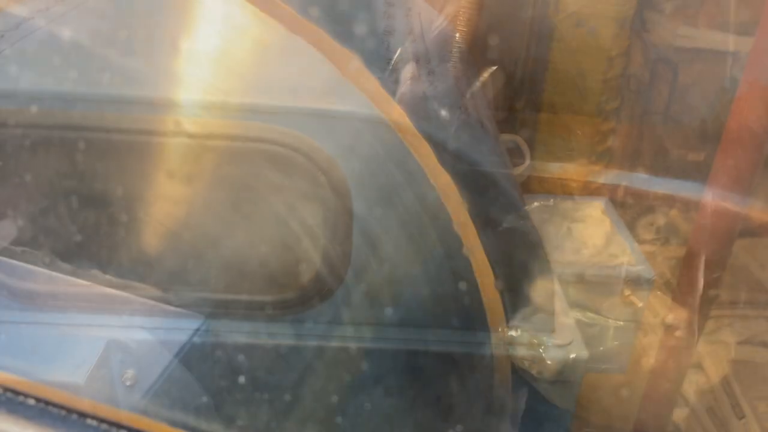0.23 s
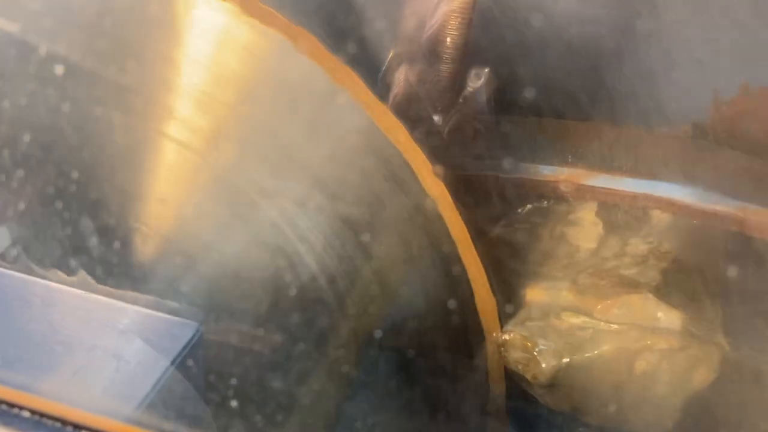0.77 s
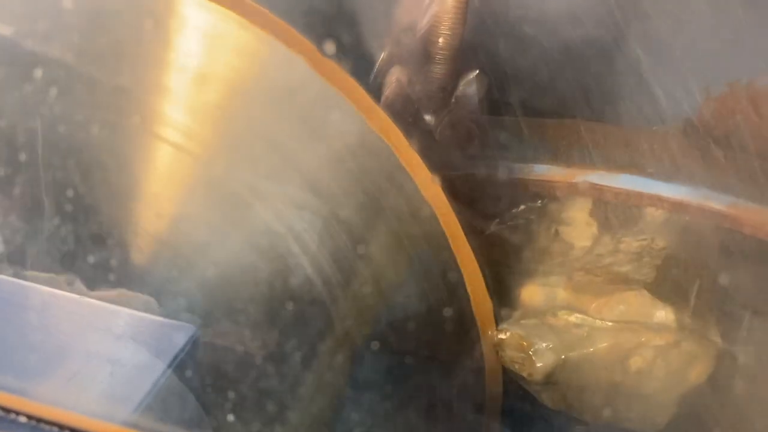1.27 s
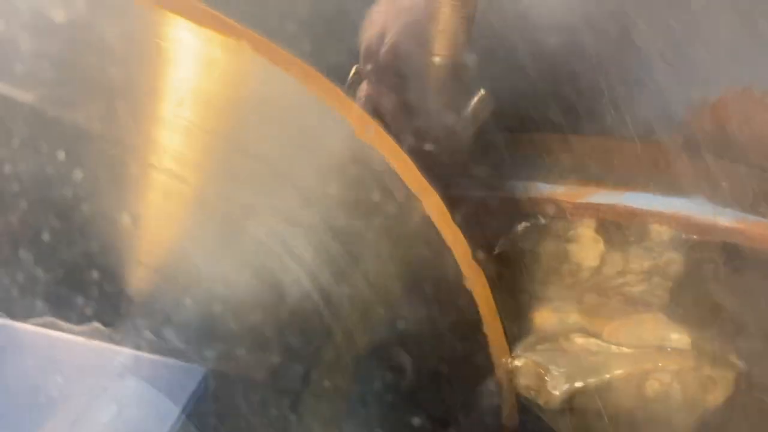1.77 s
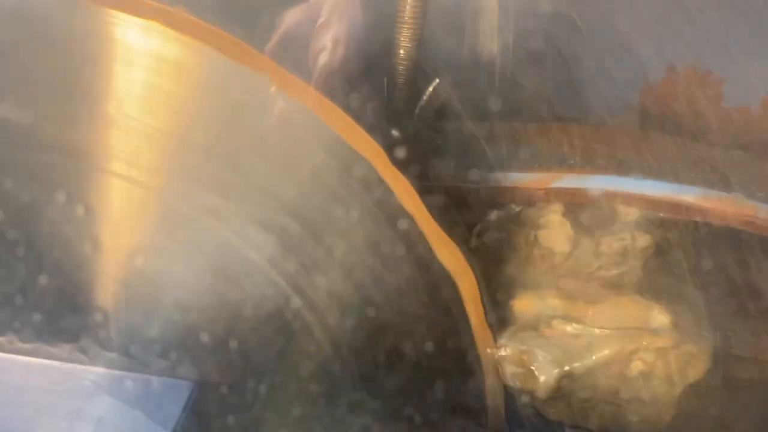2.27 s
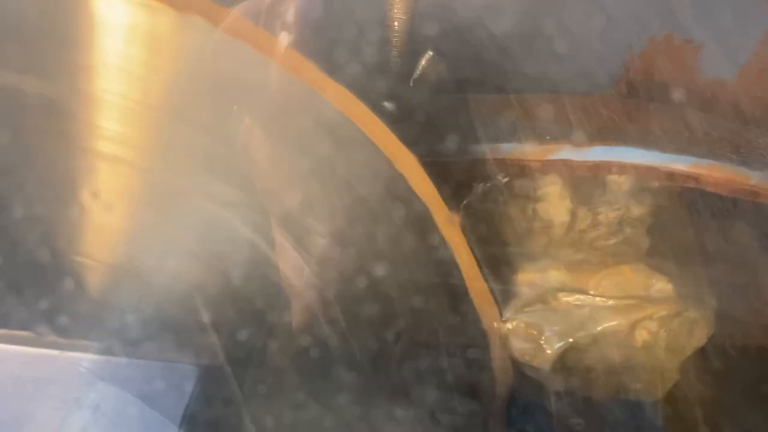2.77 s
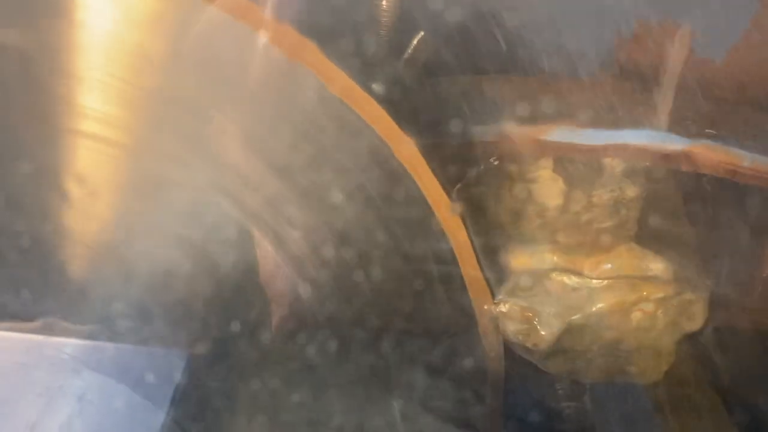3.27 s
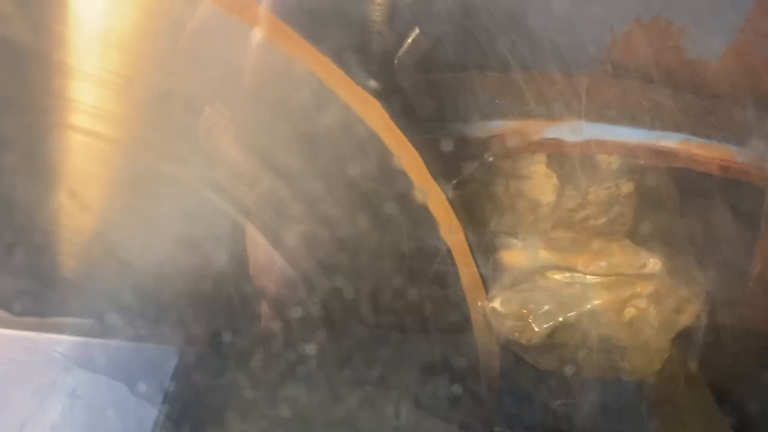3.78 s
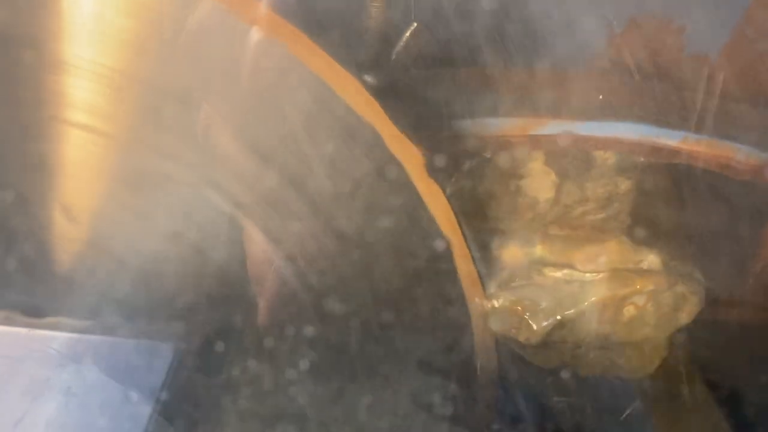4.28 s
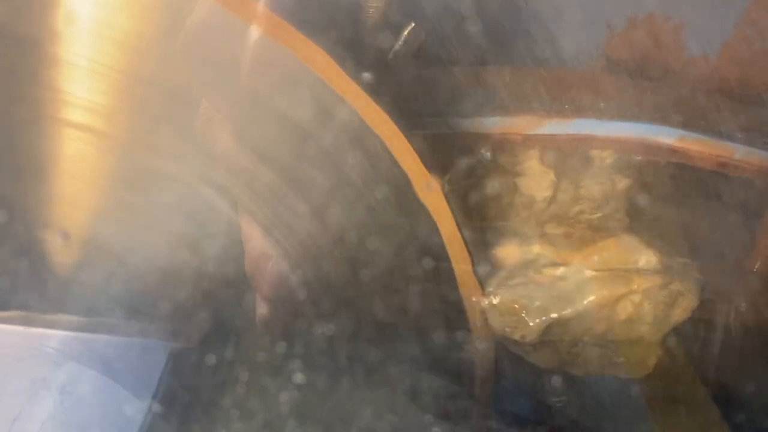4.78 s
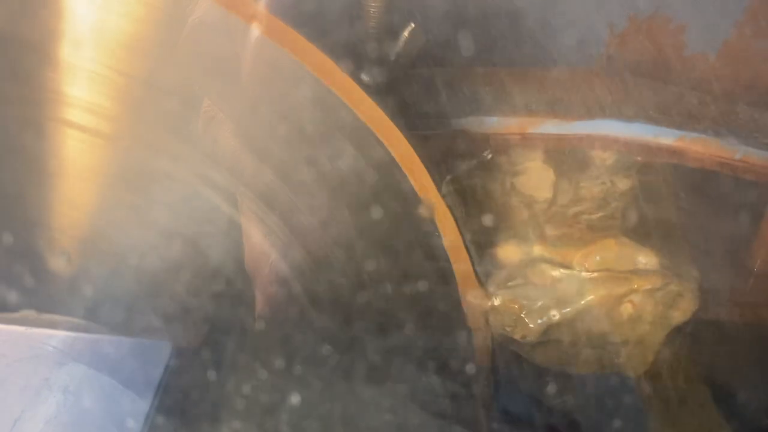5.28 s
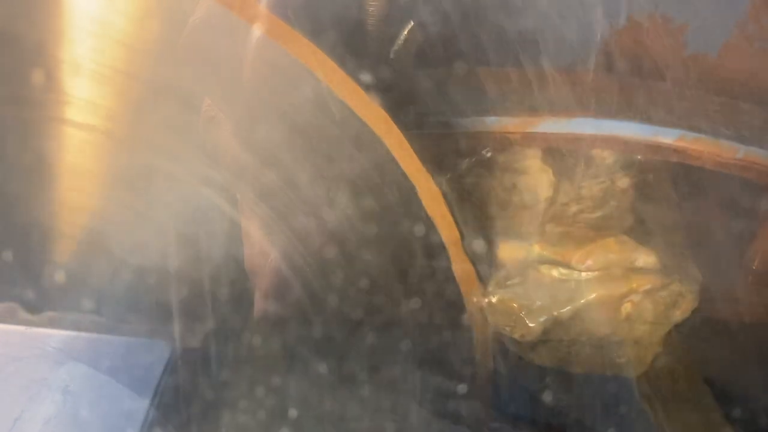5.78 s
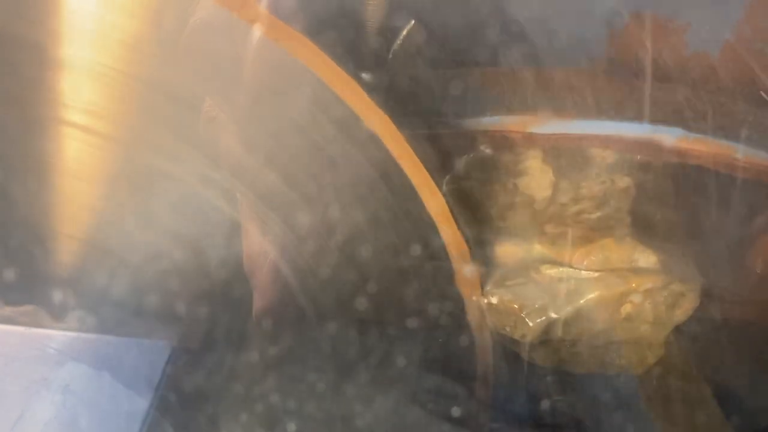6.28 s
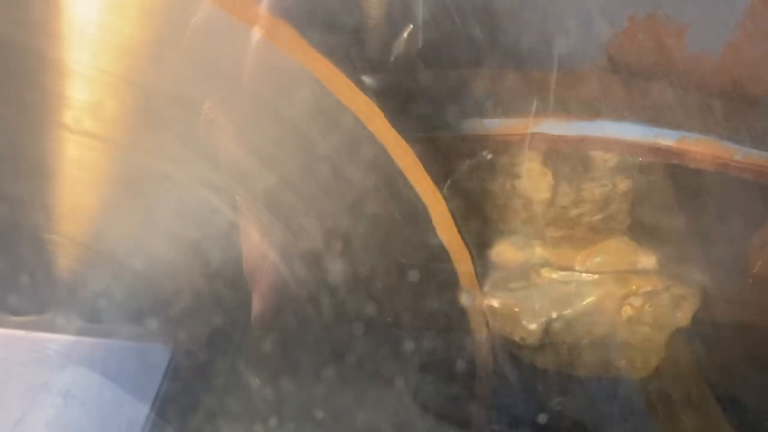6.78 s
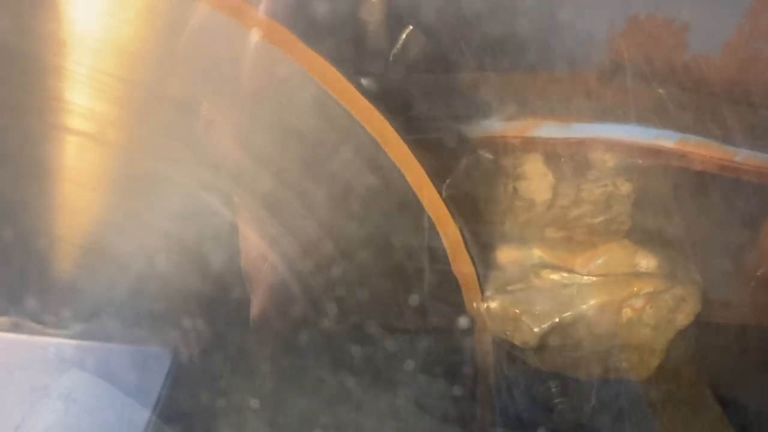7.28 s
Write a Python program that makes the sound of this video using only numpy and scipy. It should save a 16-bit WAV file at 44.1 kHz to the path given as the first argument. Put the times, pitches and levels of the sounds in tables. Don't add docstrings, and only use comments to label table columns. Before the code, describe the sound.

An oil-cooled slab saw runs continuously in a basement workshop, heard in close stereo at the window of its closed steel hood. From 0 s a low motor hum and a nasal, buzzing metallic drone dominate, quivering rapidly with the shaft rotation. Hood panels rattle and ring in short, irregular surges, several each second, shifting slightly between left and right. Grinding and oil hiss are lighter until about 2.5 s, with a brief thin vise squeal near 1.5 s. From 2.7 to 3.4 s the blade bites more firmly: the fizzing spray brightens, and wavering high singing and small squeaks become more noticeable. Pressure eases a little around 4.3 s, then peaks near 5.2 s, with a sharper grit spit at about 5.3 s. It backs off by 5.9 s, settles into steady cutting with smaller grit ticks, and presses again toward 7.5 s, ending mid-run without slowing down.

```python
import sys
import numpy as np
from scipy import signal
from scipy.fft import rfft, irfft, next_fast_len
from scipy.io import wavfile
from scipy.ndimage import uniform_filter1d

SR = 44100
rng = np.random.default_rng(int(sys.argv[2]) if len(sys.argv) > 2 else 0)


def bounce(signal):
    frames = np.transpose(np.atleast_2d(signal))
    limited = np.clip(frames, -1, 1)
    pcm = np.round(limited * 32767).astype(np.int16)
    wavfile.write(sys.argv[1], SR, pcm)


def decibels_to_gain(level_db):
    exponent = np.asarray(level_db, float) / 20
    return 10 ** exponent


N = 332073
TIME = np.arange(N) / SR
SIZE = next_fast_len(N)
HZ = np.arange(SIZE // 2 + 1) * SR / SIZE + 1e-3
SIDES = np.array([[.5], [-.5]])
SHAFT_HZ, BELT_HZ, BEARING_HZ = 16.487, 16.487 / 3, 50.99

# frequency in Hz, lead of the right side in half turns.
PORT_LEAD = [(6800, 0), (9020, 1), (11200, 2), (13120, 3), (15250, 4), (16000, 4.15)]


def walk(rate):
    hold = int(SR / 40)
    coarse = rng.standard_normal(N // hold + 80)
    slew = signal.butter(1, min(rate, 19), fs=40, output="sos")
    steps = signal.sosfiltfilt(slew, coarse)
    return np.interp(TIME, np.arange(len(steps)) * hold / SR, steps / steps.std())


def once_a_turn(hz, depth, angle):
    return 1 + depth * np.cos(2 * np.pi * hz * TIME + angle)


def white(count=1):
    return np.sqrt(SR / 2) * rng.standard_normal((count, N))


def band(lo_hz, hi_hz):
    return np.sqrt(1 / (1 + (lo_hz / HZ) ** 12) / (1 + (HZ / hi_hz) ** 12))


def ports():
    return np.exp(1j * np.pi * np.interp(HZ, *np.transpose(PORT_LEAD)))


def body(modes):
    power, lean = 0, 0
    for hz, width, db, pan_db, lead in modes:
        peak = 1 / (1 + .41 * (2 * (HZ - hz) / width) ** 2) ** 2
        power = power + peak * decibels_to_gain(db + pan_db * SIDES) ** 2
        lean = lean + peak * decibels_to_gain(db) ** 2 * np.exp(1j * lead)
    return np.sqrt(power) * np.array([np.ones(len(HZ)), ports() * lean / np.abs(lean)])


def bed(push):
    # frequency in Hz, level in dB per Hz, left-right likeness 0-1.
    bed_levels = [(29.5, -101, 0.9), (62.6, -51, 0.83), (86.6, -46, 1), (140.5, -55.5, 0.97),
                  (217.4, -49.5, 0.45), (274.4, -64.5, 0.64), (355, -54, 0.1), (661, -57, 0),
                  (1330, -67.5, 0), (1720, -74, 0.4), (2230, -67, 0.22), (2680, -73, 0.39),
                  (4670, -79.5, 0.4), (6840, -88, 0.7), (8140, -82, 0.92), (10430, -79.5, 0.93),
                  (13000, -84, 0.99), (16100, -82, 1)]
    hz, db, alike = np.transpose(bed_levels)
    share = np.clip(np.interp(np.log(HZ), np.log(hz), alike), 0, 1)
    shared = rfft(push * white(), SIZE) * np.array([np.ones(len(HZ)), ports()])
    own = rfft(push * white(count=2), SIZE)
    level = decibels_to_gain(np.interp(np.log(HZ), np.log(hz), db))
    return level * (np.sqrt(share) * shared + np.sqrt(1 - share) * own)


def loads():
    # time in seconds, pressure 0-1.
    feed_points = [
        (0, 0),
        (1.0, 0.15),
        (1.9, 0.2),
        (2.7, 0.4),
        (3.4, 0.74),
        (4.3, 0.66),
        (5.2, 0.97),
        (5.9, 0.53),
        (6.7, 0.57),
        (7.53, 0.8),
    ]
    start_db = (-5.5, -4.5, -4, -6, -9, -4)
    idle_db = (-0.42, -1.2, -7.2, -1.5, 0, -2.5)
    pressed_db = (0.05, 0.4, -6, -3, 4.5, 2)
    fade_s = 0.15
    feed = np.interp(TIME, *np.transpose(feed_points))
    return [decibels_to_gain(idle + (pressed - idle) * feed + start * np.exp(-TIME / fade_s))
            for start, idle, pressed in zip(start_db, idle_db, pressed_db)]


def machine_tones():
    # frequency in Hz, level in dB, left minus right in dB, right lead in rad.
    motor_tones = [(72.2, -30, 0, -0.0), (94.3, -42, 1, -0.1), (102.0, -30, 0, -0.0), (120.0, -29, -2, 0.0),
                   (131.2, -39, -5, 0.4), (133.2, -37, -5, 0.4), (142.1, -37, -7, 0.4),
                   (147.6, -34, -5, 0.4), (153.0, -30, -7, 0.5), (169.8, -40, -7, 0.6),
                   (203.9, -36, -1, 0.2), (240.0, -40, 1, 0.2), (255.0, -40, 0, -2.1),
                   (305.9, -44, -18, -0.4), (515.5, -39, -4, 0.7), (51, -54, 0, 0)]
    out = 0
    for (hz, db, pan_db, lead), start in zip(motor_tones, rng.random(len(motor_tones))):
        wave = np.sin(2 * np.pi * (hz * TIME + start) + 0.072 * walk(2.3) + lead * (.5 - SIDES))
        out = out + np.sqrt(2) * decibels_to_gain(db - 0.04 + pan_db * SIDES + 0.78 * walk(3.5)) * wave
    return out


def shaking(belt_share=.2):
    lap = white()[0, (TIME * BELT_HZ % 1 / BELT_HZ * SR).astype(int)]
    balls = once_a_turn(BEARING_HZ, .15, -.2) * once_a_turn(2 * BEARING_HZ, .15, 0)
    fresh = white()[0] * balls * once_a_turn(SHAFT_HZ, .14, -2.2)
    return np.sqrt(belt_share) * lap + np.sqrt(1 - belt_share) * fresh


def hood_rattle():
    # frequency in Hz, width in Hz, level in dB per Hz, left minus right in dB, right lead in rad.
    hood_modes = [(75, 14, -42, 0, -0.0), (103, 16, -45, -1, -0.0), (148, 15, -43, -5, 0.4),
                  (242, 28, -52, 0, -0.6), (300, 14, -52, 3, -0.5), (338, 14, -45, 4, -0.3),
                  (361, 30, -45, 5, -0.3), (400, 25, -46, 4, 0.2), (443, 15, -47, -1, -1.2),
                  (476, 38, -49, -2, -0.7), (518, 64, -47, -3, 0.4), (613, 20, -48, 5, -0.9),
                  (653, 16, -48, 8, -0.8), (751, 22, -52, -1, -0.2)]
    tank_modes = [(796, 15, -55, 1, -0.8), (845, 25, -57, 0, -0.1), (880, 25, -56, 3, -0.2),
                  (935, 14, -56, -1, -0.1), (965, 15, -56, 5, -0.7), (991, 21, -56, -2, 2.0),
                  (1019, 17, -55, 6, -1.7), (1063, 83, -61, -1, -0.5)]
    vise_modes = [(1170, 80, -64, 1, -1), (1287, 70, -60, 3, -2.8), (1431, 45, -58, -1, -2.5),
                  (1519, 40, -62, 3, -1.9), (1612, 28, -65, -4, -1.6), (1771, 40, -67, -1, 2.4),
                  (1912, 36, -62, 0, 1.5), (2000, 50, -64, 0, -0.5), (2077, 49, -60, -1, 0.5),
                  (2203, 44, -59, 2, 2.3), (2290, 40, -66, 0, -2)]
    bounced = 0.63 * rfft(white(count=2), SIZE) * band(lo_hz=481, hi_hz=828)
    direct = rfft(shaking(), SIZE) * (1 - 0.12 * band(lo_hz=478, hi_hz=936))
    panels = decibels_to_gain(-1.45) * (direct + bounced) * body(hood_modes + tank_modes + vise_modes)
    return panels + bed(1) * band(1, 2400)


def surges(table, lull_db):
    attack_s, release_s, lift_db = 0.022, 0.027, 1.5
    t = TIME[::32]
    gain = decibels_to_gain(lull_db + 2.5 * walk(9.2)[::32])
    for s, length, db in table:
        edge = np.minimum((t - s) / attack_s, (s + length - t) / release_s) + .5
        swell = np.sin(np.pi / 2 * np.clip(edge, 0, 1)) ** 2
        gain = np.maximum(gain, decibels_to_gain(db + lift_db) * swell)
    return np.interp(TIME, t, gain)


def panel_notes(notes, table, lull_db, rough=1.36):
    out = 0
    for hz, db, pan_db, lead in notes:
        wave = np.sin(2 * np.pi * hz * TIME + rough * walk(18.8) + lead * (.5 - SIDES))
        out = out + np.sqrt(2) * decibels_to_gain(db + pan_db * SIDES + 1.54 * walk(24)) * wave
    return out * surges(table, lull_db)


def panel_rings():
    # frequency in Hz, level against its surge in dB, left minus right in dB, right lead in rad.
    upper_panel = [
        (748.3, -1.1, -0.69, 0.081),
    ]
    middle_panels = [
        (613, -4.5, 4.2, -1.26),
        (651.2, -6, 12, -1.7),
    ]
    side_panels = [
        (448.3, -9.5, -2.5, -0.88),
        (476, -10.5, 1.5, -0.41),
        (521, -9, -1.5, .4),
    ]
    vise_jaws = [
        (2078, -8.5, -0.5, 0.35),
        (2180, -8.5, 2.9, 2.3),
    ]
    # start in seconds, length in seconds, level in dB.
    upper_surges = [(0.15, 0.046, -28.5), (0.226, 0.037, -31), (0.317, 0.051, -29), (0.432, 0.094, -32.5),
                    (0.554, 0.073, -30), (0.655, 0.19, -30.5), (0.867, 0.06, -31), (1.05, 0.041, -30),
                    (1.107, 0.064, -30.5), (1.205, 0.12, -32.5), (1.378, 0.05, -32), (1.597, 0.15, -31),
                    (1.831, 0.1, -30), (1.973, 0.19, -30), (2.248, 0.122, -30.5), (2.528, 0.081, -27),
                    (2.664, 0.091, -26.5), (2.769, 0.038, -32.5), (2.868, 0.045, -27), (2.963, 0.063, -28),
                    (3.11, 0.069, -30), (3.213, 0.028, -27), (3.28, 0.044, -35), (3.35, 0.051, -26),
                    (3.482, 0.23, -27.5), (3.86, 0.054, -30), (3.952, 0.042, -32), (4.273, 0.087, -29.5),
                    (4.45, 0.066, -30.5), (4.535, 0.245, -31.5), (4.864, 0.078, -26.5), (4.995, 0.039, -33),
                    (5.07, 0.038, -32), (5.14, 0.058, -28), (5.31, 0.23, -28.5), (5.642, 0.067, -36),
                    (5.725, 0.12, -27), (5.97, 0.12, -31), (6.176, 0.1, -29.5), (6.325, 0.11, -33),
                    (6.474, 0.051, -28), (6.562, 0.4, -29), (7.075, 0.26, -28), (7.364, 0.097, -30)]
    middle_surges = [(0.368, 0.03, -25), (0.605, 0.13, -27), (1.011, 0.056, -27.5), (1.074, 0.064, -28),
                     (1.242, 0.072, -28), (1.346, 0.23, -25), (1.827, 0.076, -27), (2.026, 0.037, -23.5),
                     (2.294, 0.058, -27.5), (2.428, 0.054, -33), (2.58, 0.09, -24.5), (2.708, 0.04, -25),
                     (2.964, 0.03, -29), (3.248, 0.11, -27), (3.483, 0.036, -25), (3.776, 0.054, -26),
                     (3.857, 0.059, -22), (3.928, 0.099, -25.5), (4.068, 0.11, -25), (4.197, 0.098, -28),
                     (4.453, 0.054, -31), (4.555, 0.21, -27.5), (4.815, 0.046, -27), (5.034, 0.043, -31),
                     (5.411, 0.057, -28), (5.634, 0.15, -25), (6.041, 0.04, -26), (6.253, 0.059, -29),
                     (6.343, 0.034, -24), (6.413, 0.03, -21.5), (6.48, 0.16, -23.5), (6.762, 0.02, -19.5),
                     (6.975, 0.038, -25), (7.031, 0.06, -29), (7.125, 0.13, -27)]
    side_surges = [(0.547, 0.049, -23), (0.626, 0.028, -30), (0.75, 0.026, -23), (0.796, 0.039, -19.5),
                   (1.193, 0.076, -22), (1.295, 0.058, -22), (1.38, 0.029, -21.5), (1.464, 0.036, -16),
                   (1.807, 0.025, -26), (1.855, 0.031, -26), (1.99, 0.04, -26), (3.159, 0.027, -17),
                   (3.724, 0.052, -25), (3.778, 0.1, -24), (4.019, 0.036, -17), (4.064, 0.062, -19),
                   (4.415, 0.061, -26), (4.485, 0.041, -27), (4.746, 0.037, -24), (5.147, 0.039, -24),
                   (6.02, 0.029, -26), (7.148, 0.038, -17.5), (7.292, 0.024, -31)]
    vise_surges = [(1.465, 0.058, -31.5), (1.87, 0.034, -30), (2.253, 0.11, -31), (2.758, 0.058, -31),
                   (2.907, 0.03, -27), (3.01, 0.042, -33), (3.083, 0.038, -37), (3.343, 0.027, -36),
                   (3.443, 0.062, -34), (3.879, 0.054, -40), (4.02, 0.072, -41), (4.19, 0.051, -33.5),
                   (4.306, 0.032, -32), (4.498, 0.042, -36.5), (4.567, 0.034, -34), (4.62, 0.031, -35),
                   (4.857, 0.1, -35), (5.027, 0.027, -42), (5.398, 0.03, -32), (5.53, 0.046, -36),
                   (5.58, 0.035, -33), (5.895, 0.044, -33), (6.363, 0.03, -36), (6.788, 0.034, -40),
                   (7.1, 0.032, -36), (7.25, 0.03, -31)]
    upper = panel_notes(upper_panel, upper_surges, lull_db=-35.5, rough=1.15)
    middle = panel_notes(middle_panels, middle_surges, lull_db=-32.0, rough=1.2)
    side = panel_notes(side_panels, side_surges, lull_db=-38)
    vise = panel_notes(vise_jaws, vise_surges, lull_db=-49)
    return upper + middle + side + vise


def drone(fade):
    # start in seconds, length in seconds, level in dB.
    drone_surges = [(0.03, 0.035, -24), (0.185, 0.1, -21.5), (0.31, 0.027, -16), (0.382, 0.13, -16.5),
                    (0.515, 0.095, -18.5), (0.727, 0.051, -16.5), (0.814, 0.026, -17.5),
                    (0.907, 0.059, -21), (1.053, 0.044, -18.5), (1.11, 0.055, -14.5), (1.235, 0.061, -15),
                    (1.408, 0.12, -18), (1.606, 0.05, -20), (1.77, 0.1, -18), (1.967, 0.069, -16.5),
                    (2.096, 0.034, -18.5), (2.155, 0.048, -20), (2.325, 0.086, -20.5), (2.428, 0.12, -14.5),
                    (2.635, 0.057, -19), (2.776, 0.31, -17.5), (3.093, 0.12, -14), (3.296, 0.14, -18),
                    (3.462, 0.12, -18.5), (3.585, 0.16, -19), (3.703, 0.061, -15.5), (3.811, 0.13, -16),
                    (3.984, 0.066, -20.5), (4.067, 0.087, -16.5), (4.197, 0.059, -18.5), (4.27, 0.031, -20),
                    (4.392, 0.039, -17.5), (4.434, 0.13, -18), (4.572, 0.061, -19.5), (4.671, 0.12, -18.5),
                    (4.872, 0.028, -17), (4.932, 0.037, -18), (5.01, 0.076, -16.5), (5.1, 0.045, -14),
                    (5.17, 0.079, -16), (5.353, 0.1, -20), (5.433, 0.072, -18.5), (5.576, 0.13, -17),
                    (5.714, 0.11, -15), (5.909, 0.034, -18.5), (6.077, 0.048, -22), (6.118, 0.069, -17.5),
                    (6.207, 0.027, -19), (6.25, 0.13, -17.5), (6.38, 0.025, -16), (6.428, 0.095, -16.5),
                    (6.513, 0.049, -20), (6.624, 0.089, -19), (6.706, 0.031, -20), (6.813, 0.021, -20.5),
                    (6.983, 0.054, -17), (7.05, 0.033, -17), (7.177, 0.067, -17.5), (7.358, 0.09, -19.5),
                    (7.458, 0.03, -20)]
    shaft_order, sag_hz, lap_hz = 22, 14, 5.7
    drag = walk(19)
    sag = 2 * np.pi * np.cumsum(sag_hz * np.maximum(drag - 0.9, 0)) / SR
    wave = np.sin(2 * np.pi * shaft_order * SHAFT_HZ * TIME - sag + 0.32 * drag - 0.43 * (.5 - SIDES))
    throb = once_a_turn(SHAFT_HZ, 0.24, 2.1) * once_a_turn(lap_hz, 0.01, 0.21) * decibels_to_gain(1.2 * walk(18))
    swell = surges(drone_surges, lull_db=-25.5)
    return np.sqrt(2 * np.minimum(fade, 1)) * swell * decibels_to_gain(-2.0 + 4.6 * SIDES) * throb * wave


def spray():
    # start in seconds, peak level in dB.
    grit_hits = [(0.9283, -21), (1.6541, -30), (2.7442, -25), (2.8656, -23), (4.6114, -35), (5.0604, -31),
                 (5.2435, -39), (5.2789, -13), (5.6476, -19), (5.7129, -20), (6.3215, -32), (6.5605, -26),
                 (6.6134, -30), (7.1631, -24)]
    gust = once_a_turn(SHAFT_HZ, 0.068, -2.5) * once_a_turn(2 * SHAFT_HZ, 0.06, 0.8) * decibels_to_gain(1.0 * walk(23))
    for s, db in grit_hits:
        gust = gust + decibels_to_gain(db + 20.0) * np.exp(-np.clip(TIME - s, 0, 1) / 0.006) * (TIME >= s)
    return gust


def singing():
    # frequency in Hz, level in dB, left minus right in dB, right lead in rad, pitch wander in Hz.
    sung_notes = [(72.9, -32.5, 0.5, -0.18, 0.081), (1906, -51, -1.5, 1.4, 10), (2203, -48.5, 4, 1.6, 18),
                  (2140, -56.5, 4, 0.1, 25), (2044, -55.5, -3, 1, 27), (1980, -56.5, -2, -0.9, 20),
                  (3342, -54, 8, -1.2, 1.5), (3858, -56, 2, -0.2, 9), (3722, -57.5, 2, .1, 12),
                  (3650, -63, 3, -0.041, 11), (2363, -60, 3.5, -2.2, 12), (2776, -61, -4, 0.14, 12),
                  (10550, -57, 0, 0.86, 11), (11000, -57, 0, 0, 22)]
    out = 0
    for hz, db, pan_db, lead, wander in sung_notes:
        pitch = hz + wander * walk(5)
        behind = lead + np.pi * np.interp(hz, *np.transpose(PORT_LEAD))
        wave = np.sin(2 * np.pi * np.cumsum(pitch) / SR + 0.75 * walk(8) + behind * (.5 - SIDES))
        out = out + np.sqrt(2) * decibels_to_gain(db + pan_db * SIDES + 2.0 * walk(2.7) + 3.0 * walk(15)) * wave
    return out


def grinding():
    bites = decibels_to_gain(0.5 * walk(22))
    return once_a_turn(SHAFT_HZ, .12, -2.94) * once_a_turn(BEARING_HZ, 0.033, -2.5) * bites


def blade_ring():
    # frequency in Hz, width in Hz, level in dB per Hz, left minus right in dB, right lead in rad.
    plate_modes = [(2507, 53, -66, 3, -2.4), (2618, 28, -65, 7, -2.3), (2846, 44, -68, 1, 0.4),
                   (2970, 45, -70, 1, -1.0), (3091, 34, -68, 4, -0.7), (3204, 59, -71, 5, 1.7),
                   (3342, 22, -61, 5, -1.3), (3410, 95, -70, 1, -1.4), (3550, 63, -75, 0, 0.6),
                   (3718, 67, -67, -1, 0.1), (3858, 28, -65, -1, -0.1), (3999, 41, -73, 3, 0.7),
                   (4147, 55, -69, 0, -0.9), (4228, 45, -71, 2, -0.7)]
    flange_modes = [(4379, 33, -72, 0, 0.2), (4583, 50, -72, 2, 0.2), (4720, 60, -73.5, 0, .2),
                    (4856, 28, -72, -1, 0.2), (5059, 87, -74, -2, -0.0), (5164, 40, -71, -3, 0.4),
                    (5332, 94, -75, -3, 0.7), (5521, 41, -72, -2, 0.2), (5691, 34, -72, -2, -0.2),
                    (5866, 32, -73, 0, 0.7), (5949, 40, -75, -1, 0.6), (6146, 83, -79, 0, 0.4),
                    (6389, 30, -77, 0, -0.1), (6633, 81, -81, -2, -0.1), ]
    # frequency in Hz, width in Hz, level in dB per Hz.
    rim_modes = [(7043, 107, -80), (7414, 143, -78), (8261, 53, -76), (8412, 48, -77), (8574, 48, -75),
                 (8875, 52, -76), (9000, 83, -77), (9370, 72, -75), (9469, 75, -78), (9731, 106, -73),
                 (10169, 165, -75), (10477, 76, -73), (10674, 61, -69), (10975, 45, -69), (11053, 53, -68),
                 (11166, 65, -73), (11775, 115, -76), (11928, 55, -73), (12163, 84, -73), (12548, 79, -73),
                 (13215, 80, -72), (13512, 52, -68), (13643, 61, -72), (13801, 79, -66), (14079, 46, -67),
                 (14252, 141, -69), (14807, 81, -73), (15099, 71, -71), (15493, 69, -70), (15690, 50, -60)]
    modes = plate_modes + flange_modes + [(*mode, 0, 0) for mode in rim_modes]
    push = grinding()
    scattered = 0.78 * rfft(push * white(count=2), SIZE) * band(lo_hz=1, hi_hz=5880)
    direct = rfft(push * white()[0], SIZE)
    evened = np.sqrt(1 + 0.27 * band(lo_hz=1, hi_hz=6100) ** 2)
    ring = decibels_to_gain(-4.0) * (direct + scattered) * body(modes) / evened
    return ring + bed(push) * band(2400, 30000)


def restless(x, quick_db=1.5, slow_db=1.05, from_hz=700):
    hz, _, spec = signal.stft(x, SR, nperseg=1024)
    db = 0
    for depth_db, bins, frames in ((quick_db, 3, 5), (slow_db, 2, 60)):
        patch = rng.standard_normal(spec.shape[1:])
        for _ in range(2):
            patch = uniform_filter1d(uniform_filter1d(patch, bins, axis=0), frames, axis=1)
        db = db + depth_db * patch / patch.std()
    gain = decibels_to_gain(db * np.clip(hz / from_hz - 1, 0, 1)[:, None])
    return signal.istft(spec * gain, SR, nperseg=1024)[1][:, :N]


def scene():
    rattle, low, flange, high, oil, song = loads()
    gust = spray()
    out = rattle * irfft(hood_rattle(), SIZE)[:, :N]
    blade = blade_ring()
    edges_hz = 1, 6000, 7000, 12500, 30000
    for lo, hi, load in zip(edges_hz, edges_hz[1:], (low, flange, high * gust, oil * gust)):
        out = out + load * decibels_to_gain(0.16 * walk(29.0)) * irfft(blade * band(lo, hi), SIZE)[:, :N]
    return restless(out) + rattle * machine_tones() + drone(rattle) + panel_rings() + song * singing()


def thin_stereo(x, top_hz, under_db=-8.0, from_hz=5600):
    # frequency in Hz, step against the local level in dB.
    step_levels = [(300, -22), (1000, -13), (1700, -6), (3500, -3.5), (5000, -2), (6500, 1.5), (8000, 3),
                   (10000, -1), (15000, 0)]
    hop, grid, band_bins = 1024, 647, 8
    pair = np.array([x[0] + x[1], x[0] - x[1]]) / 2
    blocks = N // hop + 4
    margins = (2 * hop - grid, (blocks - 2) * hop - N + grid)
    padded = np.pad(pair, ((0, 0), margins)).reshape(2, blocks, hop)
    n, k = np.arange(2 * hop) + .5 + hop / 2, np.arange(hop) + .5
    basis = np.cos(np.pi / hop * np.outer(n, k))
    round_slope = np.sin(np.pi / 2 * k / hop)
    steep_slope = signal.windows.kaiser_bessel_derived(2 * hop, 4 * np.pi)[:hop]
    choice = (uniform_filter1d(rng.standard_normal(blocks), size=4) > 0).astype(int)
    slope = np.array([round_slope, steep_slope])[choice]
    window = np.concatenate([slope[:-1], slope[1:, ::-1]], axis=1)
    frames = np.concatenate([padded[:, :-1], padded[:, 1:]], axis=2) * window
    bins = (frames @ basis).reshape(2, blocks - 1, -1, band_bins)
    band_hz = np.arange(hop // band_bins) * band_bins * SR / 2 / hop
    power = (bins ** 2).mean(axis=3)
    wide = np.repeat(power.reshape(2, blocks - 1, -1, 4).mean(axis=3), 4, axis=2)
    power = np.where(band_hz < from_hz, uniform_filter1d(power, size=3, axis=2), wide)
    around = power.sum(axis=0) + 1e-18
    keep = (power > decibels_to_gain(under_db) ** 2 * around) | (band_hz < from_hz)
    keep = keep & (band_hz < top_hz + 100)
    step = (decibels_to_gain(np.interp(band_hz, *np.transpose(step_levels))) * np.sqrt(around))[..., None]
    count = np.floor((np.abs(bins) / step) ** .75 + .4054)
    stored = np.sign(bins) * count ** (4 / 3) * step
    back = (stored * keep[..., None]).reshape(2, blocks - 1, hop) @ basis.T * window * 2 / hop
    joined = (back[:, 1:, :hop] + back[:, :-1, hop:]).reshape(2, -1)
    total, difference = joined[:, hop - grid:hop - grid + N]
    return np.array([total + difference, total - difference])


def low_pass(x):
    return signal.sosfilt(signal.butter(12, 21000, fs=SR, output="sos"), x)


def record(dry):
    top_hz = 15760
    cut = signal.sosfilt(signal.ellip(14, .3, 70, top_hz, fs=SR, output="sos"), dry)
    cut = signal.sosfilt(signal.butter(3, 48., "high", fs=SR, output="sos"), cut)
    mix = thin_stereo(cut, top_hz)
    return low_pass(mix)


dry = scene()
out = record(dry)
bounce(out)
```